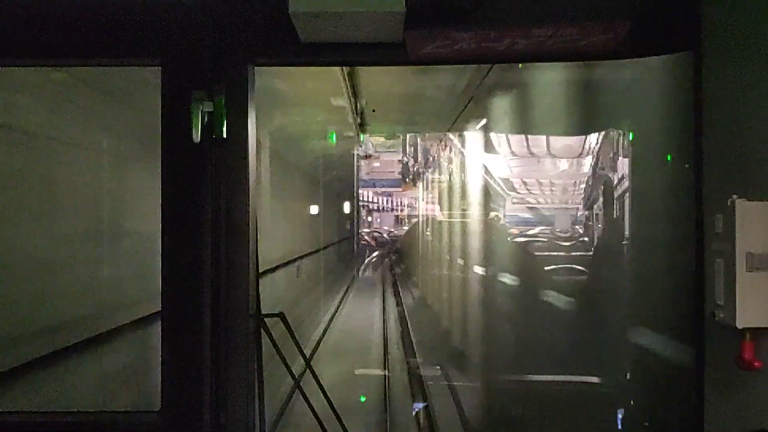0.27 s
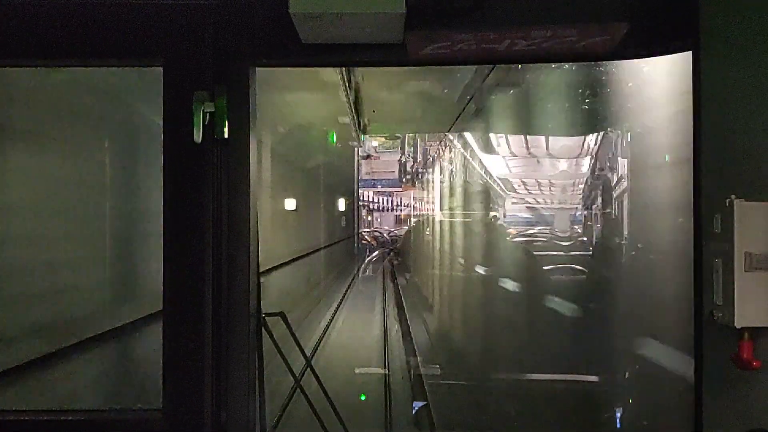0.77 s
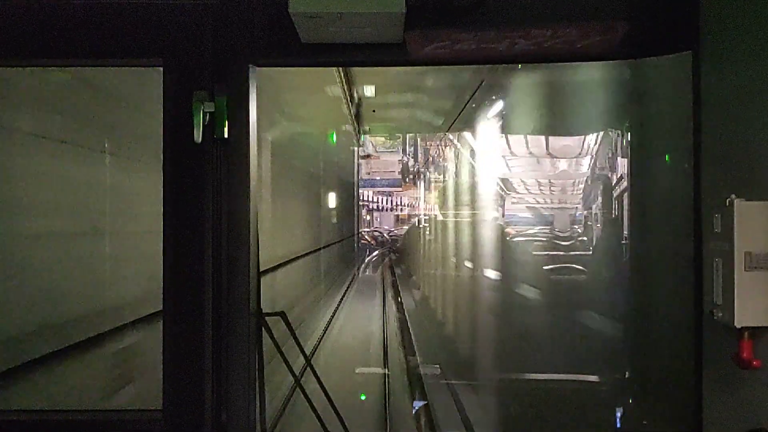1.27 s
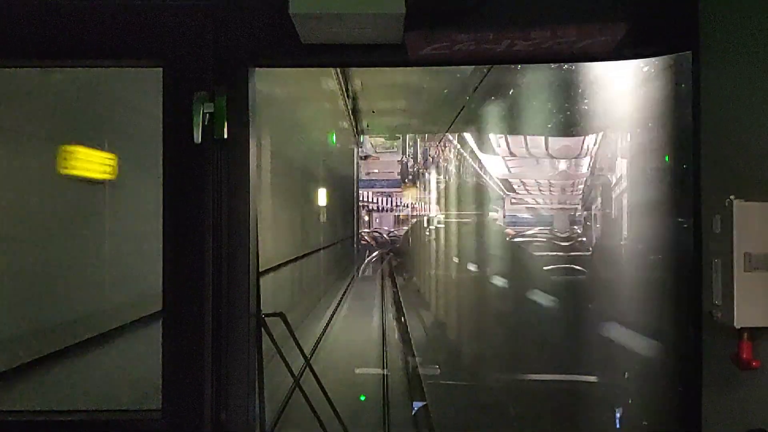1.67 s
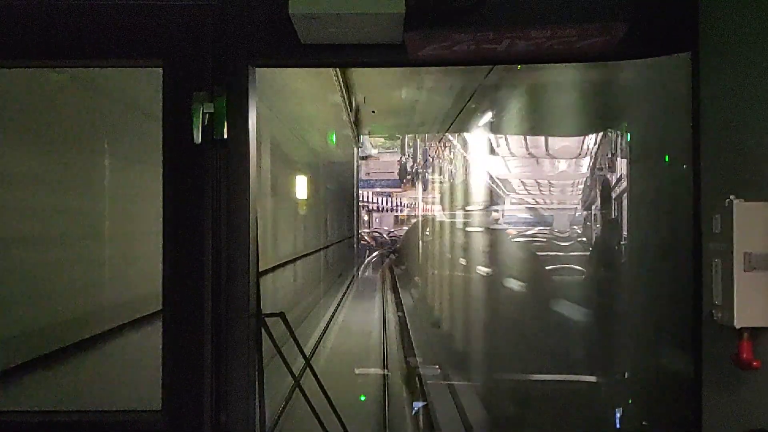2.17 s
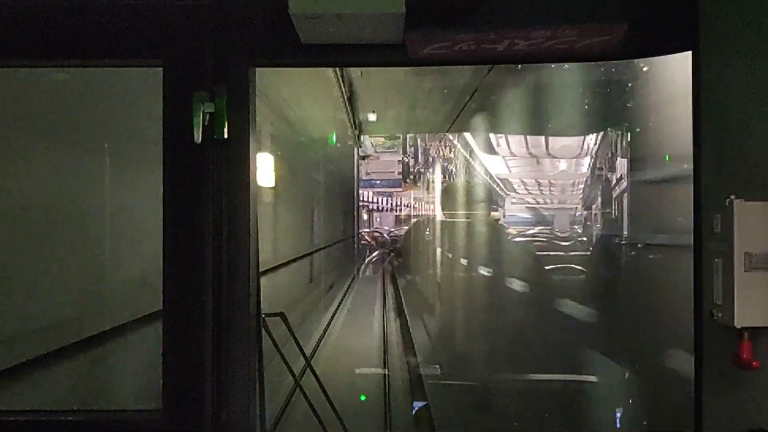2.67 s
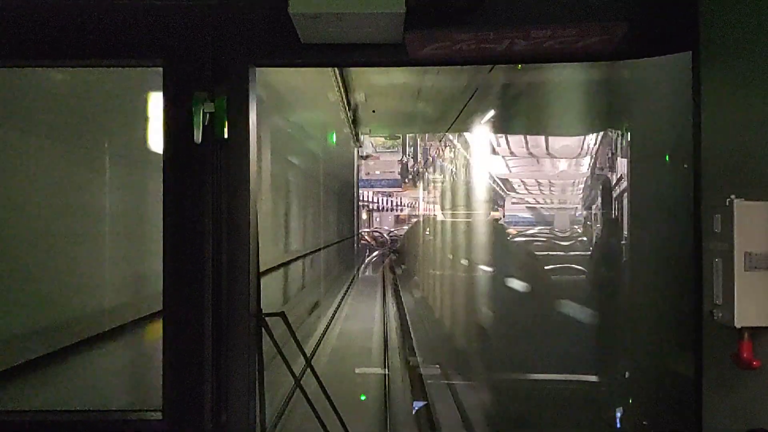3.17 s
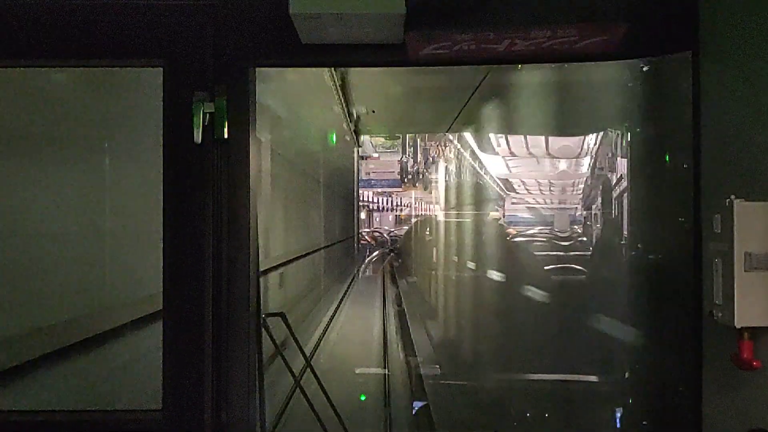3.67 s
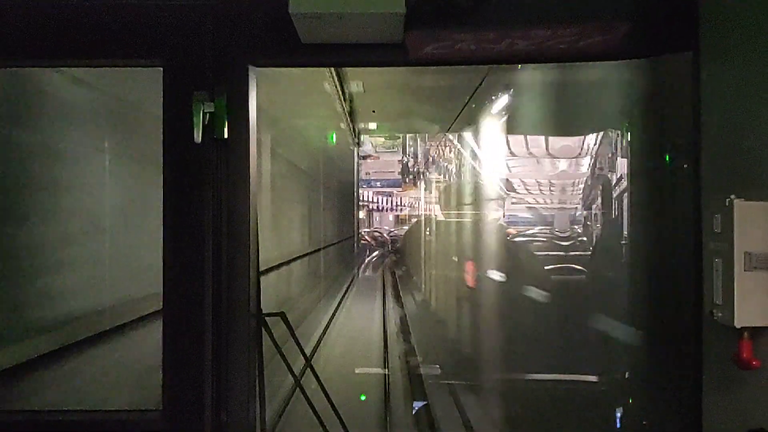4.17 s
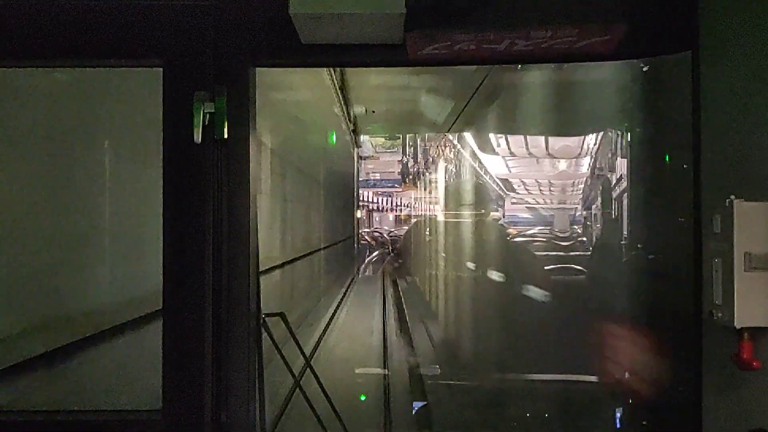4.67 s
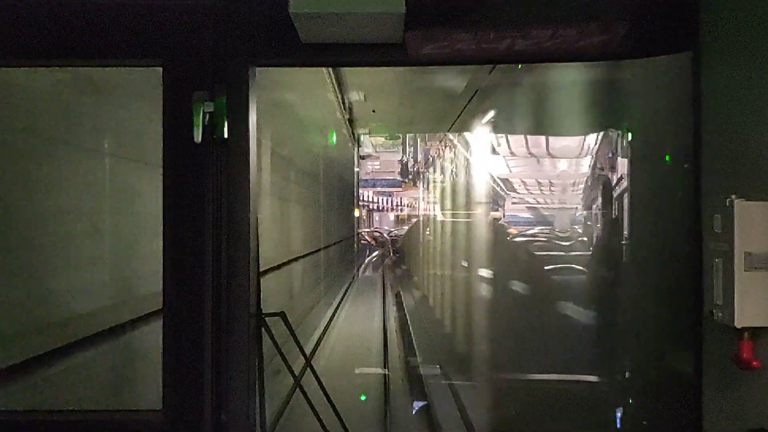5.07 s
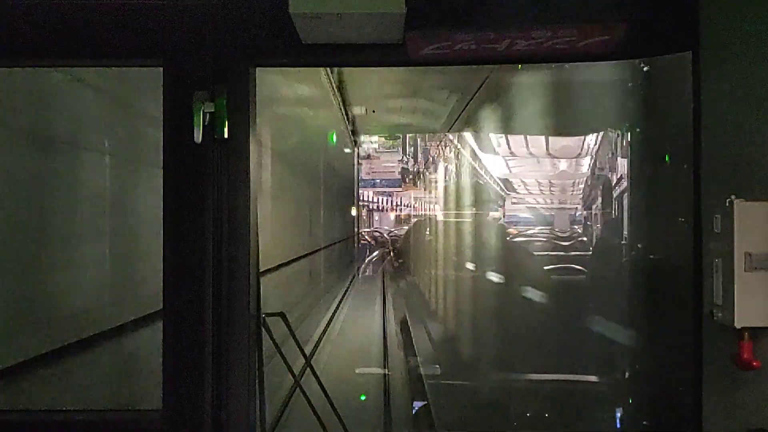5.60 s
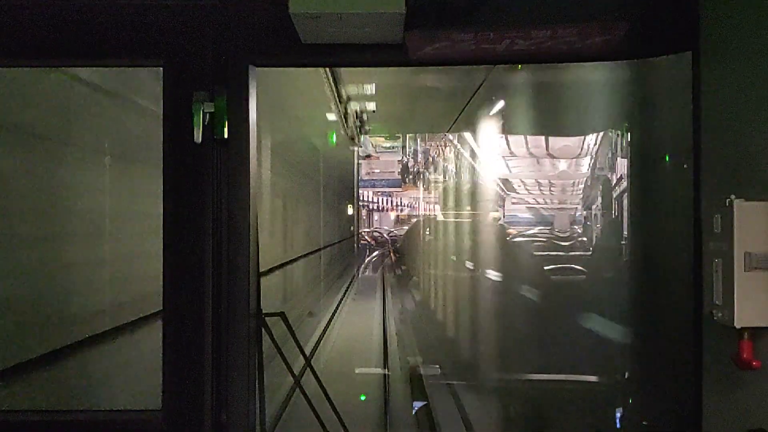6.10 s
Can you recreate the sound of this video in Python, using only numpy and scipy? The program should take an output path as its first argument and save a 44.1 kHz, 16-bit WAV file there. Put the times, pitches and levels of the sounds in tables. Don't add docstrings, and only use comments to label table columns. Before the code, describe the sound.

Inside the front cab of an electric train running through a tunnel, a steady, dark rumble and hollow mid-low roar continue throughout, with a low unsteady motor hum beneath and only a thin rush of air on top. At about 0.1 and 0.2 seconds wheels strike a rail gap close by: two hard clacks, the second stronger, with woody floor knocks and a brief metal ring. Around 0.9 and 1.0 seconds softer, farther wheels clank as the roar swells, and a faint last crossing at 1.35 trails a weak metallic ringing. From 2 seconds the ride is calmer. A faint bump comes at 2.55, small ticks at 2.7 and 3.1, and subtle rail pings, the clearest near 4.1. Between 5.55 and 5.85 a rapid cluster of dull, boomy thumps arrives with light chattering ticks, then plain rolling continues until the cut at 6.3. Mono, muffled, close interior perspective.

```python
import sys
import numpy as np
from scipy import signal
from scipy.fft import rfft, irfft
from scipy.io import wavfile
from scipy.ndimage import uniform_filter1d, map_coordinates

SR = 44100
rng = np.random.default_rng(int(sys.argv[2]) if len(sys.argv) > 2 else 0)


def materialize(psi):
    bounded = np.clip(np.atleast_2d(psi).T, -1, 1)
    quanta = np.round(bounded * 32767).astype(np.int16)
    wavfile.write(sys.argv[1], SR, quanta)


def linear_from_db(decibels):
    return 10 ** (np.asarray(decibels, float) / 20)


N = 279594

ROAR = (420, 950)


def unit(x):
    return x / np.sqrt(np.mean(x ** 2) + 1e-20)


def curves(rows):
    s, *cols = np.transpose(rows)
    return [np.interp(np.arange(N) / SR, s, c) for c in cols]


def wobble(rate):
    knots = rng.standard_normal(int(N * rate / SR) + 4)
    return map_coordinates(knots, [np.arange(N) * rate / SR])


# f/Hz, level/dB
SHELL = [(22, -7), (45, 1.5), (90, 0), (250, -3.5), (500, -8.5), (1000, -9), (1350, -11.5), (1750, -17.5),
         (2150, -23.5), (2450, -33), (3100, -36.5), (4100, -46), (5000, -40), (7600, -47.5)]
# f/Hz, width/Hz, lift/dB
PANELS = [(58.5, 16, 2), (103, 17, 2), (135.5, 12, 4), (149, 33, 3.5), (209.2, 41, 4), (253, 18, -2),
          (335.6, 15, 2), (459, 27, -2), (417, 42, 3), (529, 52, 4.5), (625, 100, 6), (708.5, 140, 12),
          (782, 99, 13), (1054, 61, 5), (1184, 46, 6), (1526, 181, 10.5), (1867, 93, 5.5), (2031, 150, 6.5),
          (2780, 180, 9), (3440, 83, 3.5), (5815, 1200, 7.5), (7580, 550, 6)]


def through_car(band, modes):
    size = 2 ** 15
    hz = np.fft.rfftfreq(size, 1 / SR) + 1e-3
    f, db = np.transpose(SHELL)
    gain = linear_from_db(np.interp(np.log(hz), np.log(f), db))
    peaks = sum((linear_from_db(lift) - 1) / (1 + (2 * (hz - centre) / width) ** 2) ** 2 for centre, width, lift in modes)
    gain = gain * (1 + peaks)
    low, high = band
    gain = gain / np.sqrt((1 + (low / hz) ** 6) * (1 + (hz / high) ** 6))
    cepstrum = irfft(np.log(gain + 1e-7))
    cepstrum[1:size // 2] *= 2
    cepstrum[size // 2 + 1:] = 0
    response = irfft(np.exp(rfft(cepstrum)))[:size // 2]
    return response / np.linalg.norm(response)


def heard(force, band, modes=PANELS):
    return signal.fftconvolve(force, through_car(band, modes))[:N]


def rough(patchy_db, size=5):
    spectrum = signal.stft(rng.standard_normal(N + 1024), nperseg=512)[2]
    field = uniform_filter1d(rng.standard_normal(spectrum.shape), size=size, axis=0)
    field = uniform_filter1d(field, size=14, axis=1)
    return unit(signal.istft(spectrum * linear_from_db(patchy_db * unit(field)), nperseg=512)[1][:N])


# t/s, roar level/dB
TRACK = [(0, -26.5), (.25, -28), (.45, -30.5), (.65, -29), (.87, -29), (.97, -23.5), (1.25, -27.5),
         (1.6, -30), (2, -32), (2.4, -30), (3, -34), (4, -31.5), (5.2, -33), (5.8, -32.5), (6.34, -32)]


def rolling():
    roar_db, = curves(TRACK)
    extra_db = roar_db + 32
    rumble_db = -38 + .05 * extra_db
    ring_db = -41 + .33 * extra_db
    rush_db = -61 + .29 * extra_db
    sway = wobble(7)
    rumble = linear_from_db(rumble_db + .4 * wobble(5.15)) * rough(patchy_db=-1.0)
    roar = linear_from_db(roar_db - 2.0 + .5 * sway + .49 * wobble(25)) * rough(patchy_db=1.0)
    ring = linear_from_db(ring_db + .2 * sway + .27 * wobble(14)) * rough(patchy_db=2.47, size=2)
    rush = linear_from_db(rush_db + .4 * sway + .34 * wobble(6.1)) * rough(patchy_db=.74)
    return (heard(rumble, (10, 420)) + heard(roar, ROAR)
            + heard(ring, (950, 3900)) + heard(rush, (3900, 12000)))


# t/s, level/dB, grinding length/s, distance from the cab/0-1
CROSSINGS = [
    (0.072, 0.5, .09, 0.18),
    (0.216, 2, 0.085, 0.08),
    (0.883, -5.5, 0.073, 0.7),
    (1.031, -8, 0.12, 1),
    (1.345, -10, .15, 0.93),
]
# t/s, level/dB
BUMPS = [
    (2.538, -39),
    (5.555, -35),
    (5.64, -30),
    (5.734, -24),
    (5.828, -38),
]
# t/s, level/dB, chatter length/s
TICKS = [
    (2.698, -56.5, .02),
    (3.128, -60, 0.013),
    (5.552, -61, .05),
    (5.64, -62.5, .02),
    (5.702, -56, .02),
    (5.735, -55.5, 0.035),
    (5.809, -58, .015),
]
# f/Hz, width/Hz, lift/dB
WHEEL_MODES = [(1220, 80, 2), (1430, 110, 4), (1906, 110, 5.5), (2050, 140, 8), (2600, 90, 4),
               (3000, 80, 8), (3400, 200, 4), (4950, 300, 2), (5900, 300, 4), (7800, 900, 2.5)]


def jolts():
    bands = ((67, 190), (363, 400), (1086, 2600), (4700, 9000), ROAR)
    crossing_db = np.array((-53, -31, -30, -48.5, -31.5))
    far_loss_db = np.array((0, 10, -2, 16.5, 1.5))
    bump_db = np.array((-.5, -11, -23.5, -41, -20))
    tick_db = np.array((-15, -3, -7, 1, -5))
    quick = np.array([[1], [1], [1], [.7], [1]])
    rise = np.array([[.008], [.008], [.008], [.0015], [.006]])
    swell, after_db, release_s = .12, -2.5, .006

    # time (s), part levels (dB), hold (s), tunnel t60 (s); far wheels ring longer
    blows = [(s, db + crossing_db - far * far_loss_db, hold, 1 + .75 * far) for s, db, hold, far in CROSSINGS]
    blows += [(s, db + bump_db, 0, .51) for s, db in BUMPS]
    blows += [(s, db + tick_db, hold, .7) for s, db, hold in TICKS]

    power, t = np.zeros((5, N + 2 * SR)), np.arange(SR) / SR
    for s, dbs, hold, t60 in blows:
        past = np.maximum(t - hold, 0)
        shape = linear_from_db(after_db * (1 - np.exp(-past / release_s)) - 60 * past / (t60 * quick))
        shape = shape * (1 - np.exp(-t / (rise + swell * hold)))
        power[:, round(s * SR):][:, :len(t)] += (linear_from_db(dbs)[:, None] * shape) ** 2
    shaking = np.sqrt(power[:, :N]) * rng.standard_normal((5, N))
    shaking[2:4] *= linear_from_db(1.2 * np.array([wobble(60), wobble(110)]))
    return sum(heard(part, band, PANELS + WHEEL_MODES) for part, band in zip(shaking, bands))


def damped_tones(tones):
    out, t = np.zeros(N + SR), np.arange(SR // 2) / SR
    for s, hz, db, rise, t60 in tones:
        shape = linear_from_db(-60 * t / t60) * (1 - np.exp(-(t / rise) ** 2))
        out[round(s * SR):][:len(t)] += linear_from_db(db) * shape / shape.max() * np.sin(2 * np.pi * hz * t)
    return out[:N]


# f/Hz, peak level/dB, delay t/s, t60/s
WHEEL_TONES = [(1498, -27.5, -.005, 0.11), (1545, -26.5, .01, 0.14), (1983, -35, .015, 0.12),
               (2033, -35.5, .055, 0.087), (2797, -53, .06, .2)]
# f/Hz, peak level/dB, delay t/s, t60/s
FITTING_TONES = [(5890, -0.5, 0.0036, .11), (7970, -4, .001, .04)]


def struck_rings():
    tones = []
    for blows, modes, rise in ((CROSSINGS, WHEEL_TONES, .004), (TICKS, FITTING_TONES, .002)):
        for s, db, *_ in blows:
            for hz, level, late, t60 in modes:
                detuned = hz * (1 + .012 * rng.normal())
                tones.append((s + late, detuned, db + level, rise, t60))
    return damped_tones(tones)


# t/s, f/Hz, peak level/dB
BOGIE = [
    (2.579, 120, -27),
    (5.588, 131.4, -27),
    (5.741, 154, -23.5),
    (5.79, 134, -23),
    (5.827, 141, -21.5),
    (5.887, 113, -36.5),
]
# t/s, f/Hz, peak level/dB
BOARDS = [
    (.134, 239, -25),
    (.154, 314, -23.5),
    (.218, 447, -19),
    (.25, 409, -16.5),
    (.281, 398, -24),
    (.302, 402, -27),
    (.429, 321, -24.5),
    (2.04, 526, -27),
    (5.69, 525, -32),
]
# t/s, f/Hz, peak level/dB
RAIL = [
    (.41, 753, -26),
    (.705, 766, -26.5),
    (2.398, 715, -27.5),
    (3.245, 782, -27),
    (4.121, 779, -22.5),
    (4.236, 729, -31),
]
# t/s, f/Hz, peak level/dB
FLANGE = [
    (.936, 1545, -35),
    (1.1, 1935, -39),
    (1.384, 1370, -33),
    (1.432, 1435, -34.5),
    (1.49, 1415, -34),
    (1.55, 1360, -34),
    (2.15, 1545, -40),
    (2.45, 1545, -41),
    (4.55, 1560, -37.5),
]
# t/s, f/Hz, peak level/dB
RIM = [
    (.95, 2890, -54.5),
    (1.09, 2780, -54),
    (4.46, 2780, -63),
    (4.549, 2780, -60),
    (4.74, 2780, -62.5),
    (5.33, 2830, -61),
    (5.41, 2790, -63),
]


def part_rings():
    parts = ((BOGIE, .006, .11), (BOARDS, .0034, .072), (RAIL, .0083, .073),
             (FLANGE, .005, .2), (RIM, .008, .2))
    return damped_tones([(*row, rise, t60) for rows, rise, t60 in parts for row in rows])


def motor():
    hum_hz = 59 + 1.098 * wobble(5)
    gear_hz = 106.5 + 1.4 * wobble(6)
    hum = linear_from_db(-45 + .92 * wobble(5)) * np.sin(2 * np.pi * np.cumsum(hum_hz) / SR)
    gear = linear_from_db(-53.0 + 1.8 * wobble(2.6)) * np.sin(2 * np.pi * np.cumsum(gear_hz) / SR)
    return np.sqrt(2) * (hum + gear)


def scene():
    return (rolling() + jolts() + struck_rings() + part_rings() + motor())[None]


def top_cut(x):
    return signal.sosfilt(signal.butter(12, 8940, fs=SR, output="sos"), x)


# f/Hz, level/dB
SMOOTHING = [(7000, 0), (7600, -2.5), (8000, -4), (8400, -15), (8700, -20.5), (8960, -40.5)]


def record(dry):
    edge_hz, half_hz, top_hz = 7800, 8000, 8960
    hz, spectrum = np.fft.rfftfreq(N, 1 / SR), rfft(dry)
    edge = irfft(spectrum * (hz > edge_hz), N) * linear_from_db(-1.5 + 2.5 * wobble(22))
    spectrum = spectrum * (hz <= edge_hz) + rfft(edge)
    half = round(half_hz * N / SR)
    spectrum[:, half:2 * half + 1] = np.conj(spectrum[:, half::-1])
    f, db = np.transpose(SMOOTHING)
    smoothing = linear_from_db(np.interp(hz, f, db)) * (hz < top_hz)
    mix = irfft(spectrum * smoothing, N)
    return top_cut(mix)


dry = scene()
out = record(dry)
materialize(out)
```